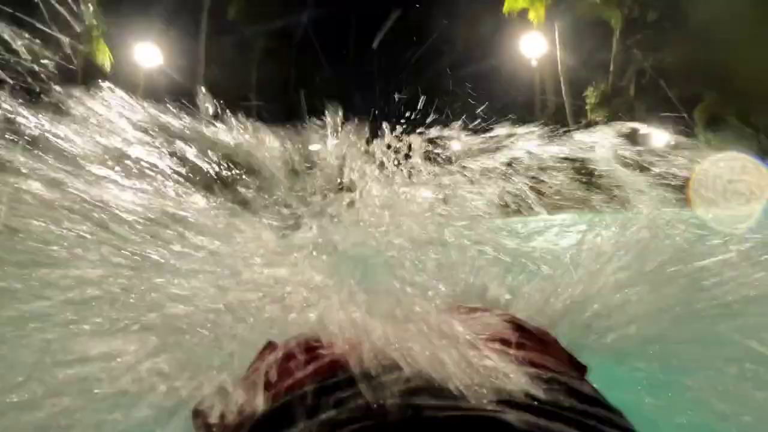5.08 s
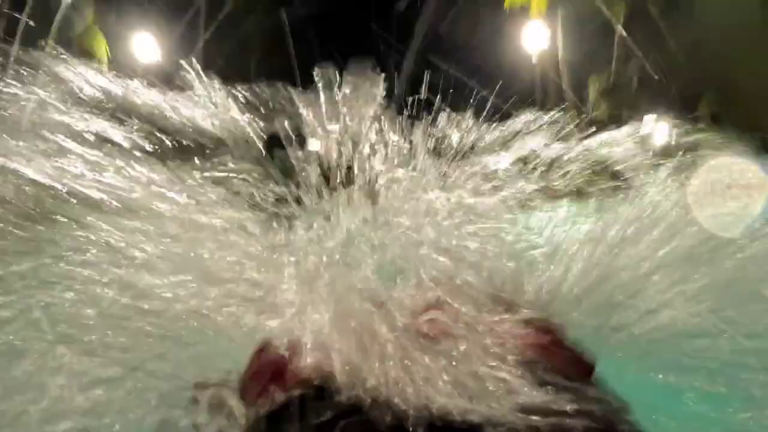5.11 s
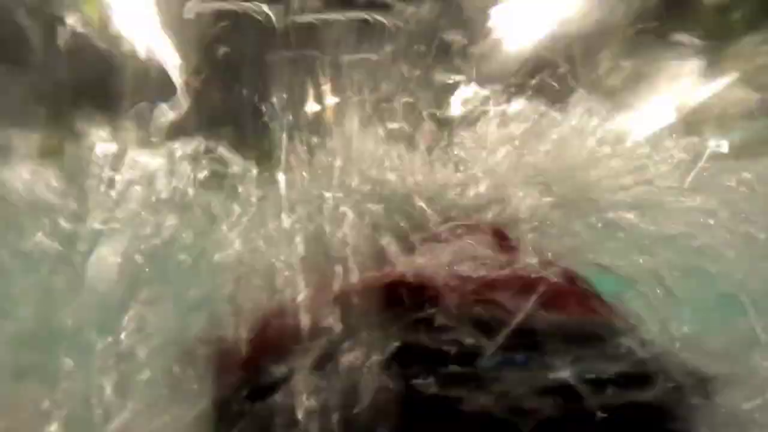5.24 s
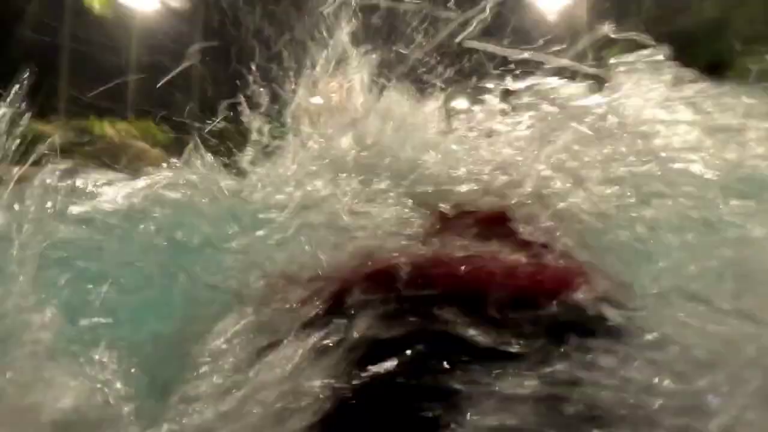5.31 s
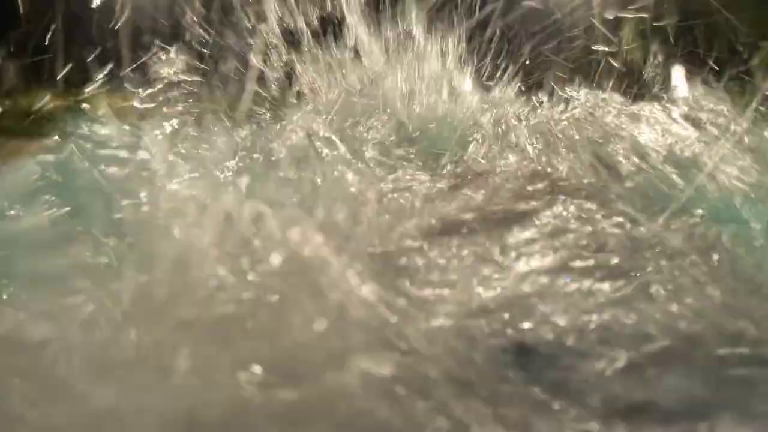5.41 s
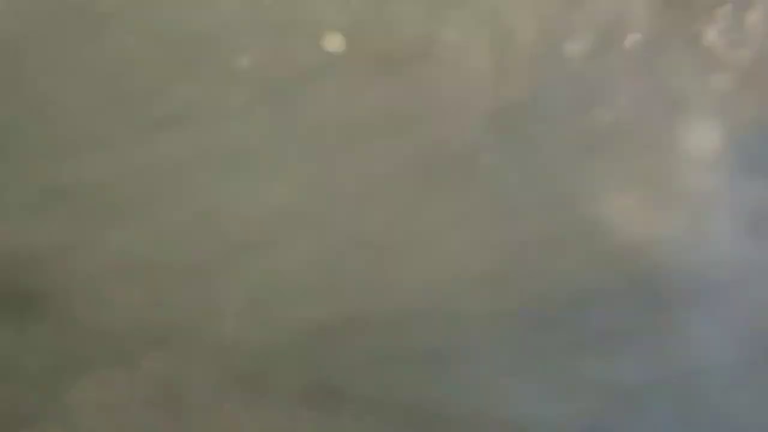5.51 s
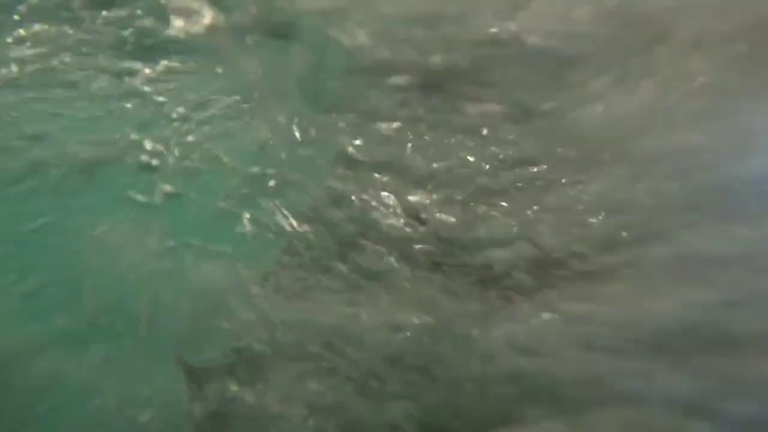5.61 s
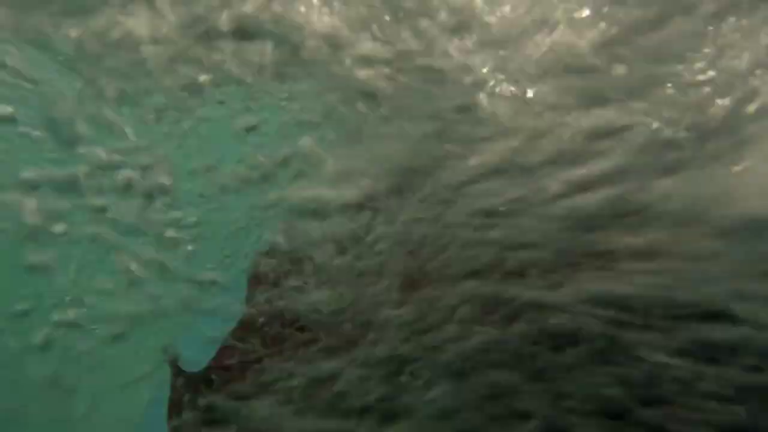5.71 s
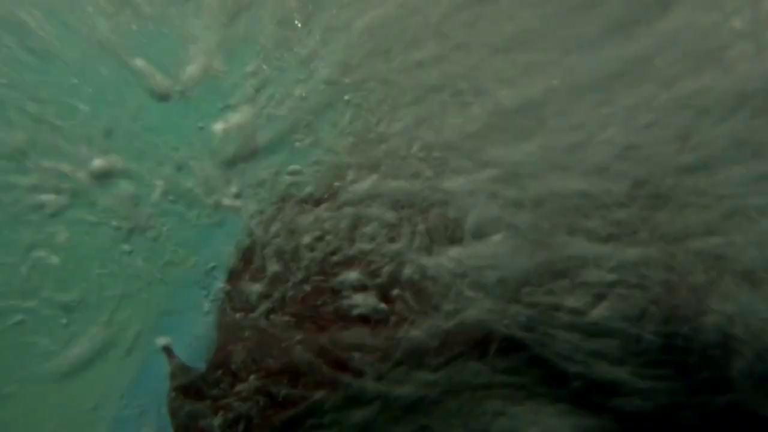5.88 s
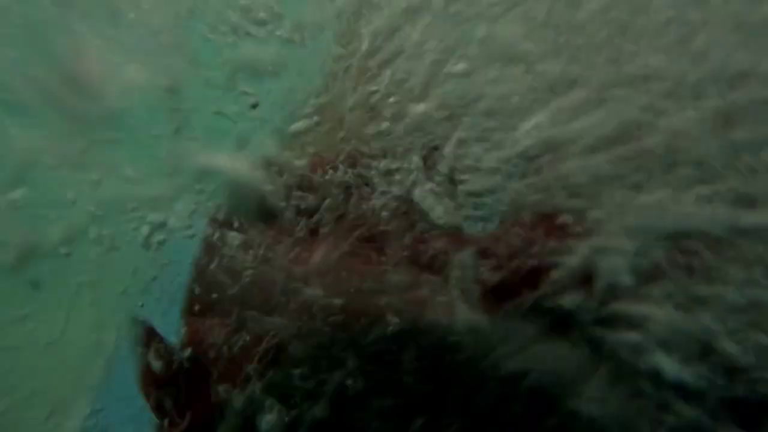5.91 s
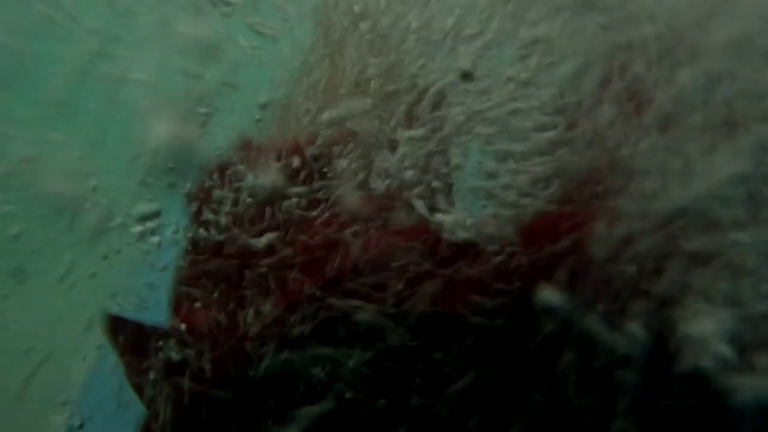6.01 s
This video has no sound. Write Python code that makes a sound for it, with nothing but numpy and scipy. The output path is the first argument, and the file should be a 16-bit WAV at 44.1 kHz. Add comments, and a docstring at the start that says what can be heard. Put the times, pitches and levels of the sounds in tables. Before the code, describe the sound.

Low wind buffeting and hollow water hiss with scattered drop knocks in a tube, then a hard slap, bright splash and churning underwater bubbles.

```python
"""A plunge into a pool ends a ride down a dark, enclosed water slide, heard by a camera the rider carries.
At the exit a wave slaps the case (noise bursts), spray bursts over it and the sound sinks into churning
bubbles (gliding, decaying sines). Before that, stray drops knock on the case (struck modes) and spatter
drums on it, the sheet of water hisses in the tube (filtered noise and clicks) and air buffets the
microphone (very low noise)."""
import sys
import numpy as np
from scipy import signal
from scipy.fft import rfft, irfft, next_fast_len
from scipy.io import wavfile
from scipy.ndimage import uniform_filter1d, map_coordinates

SR = 44100
rng = np.random.default_rng(int(sys.argv[2]) if len(sys.argv) > 2 else 0)


def output_pcm(signal):
    """Save a mono or channel-first signal as 16-bit PCM at the path in sys.argv[1].

    Samples are clipped to [-1, 1] before scaling.
    """
    pcm = np.clip(np.atleast_2d(signal).T, -1, 1) * 32767
    wavfile.write(sys.argv[1], SR, np.round(pcm).astype(np.int16))


N = 276507
TIME, FREQ = np.arange(N) / SR, np.fft.rfftfreq(N, 1 / SR)


def gain_of(db):
    """Decibels to amplitude."""
    return 10 ** (np.asarray(db) / 20)


def evened(x):
    """Scales to an rms of one."""
    return x / np.sqrt(np.mean(x ** 2) + 1e-20)


def read(points, hz=FREQ):
    """Reads a spectrum along a log-frequency axis."""
    point_hz, value = np.transpose(points)
    return np.interp(np.log(hz + 1), np.log(point_hz + 1), value)


def curves(rows):
    """Each column of a curve table at every sample."""
    s, *columns = np.transpose(rows)
    return [np.interp(TIME, s, column) for column in columns]


def coloured(x, db):
    """Filters by a gain in dB for each frequency."""
    size = next_fast_len(N + 4096)
    gain = gain_of(np.interp(np.fft.rfftfreq(size, 1 / SR), FREQ, db))
    return irfft(rfft(x, size) * gain, size)[..., :N]


def spread(pair, side):
    """Two signals become the middle and the coloured side of the microphone pair."""
    wide = coloured(pair[1], read(side))
    return np.array([pair[0] + wide, pair[0] - wide])


def add(mix, s, sound):
    """Mixes a sound in at a time."""
    part = mix[..., round(s * SR):][..., :sound.shape[-1]]
    part += sound[..., :part.shape[-1]]


def drift(per_s):
    """Smooth chance of rms one, with per_s new values a second."""
    knots = rng.standard_normal(4096)
    return evened(map_coordinates(knots, [TIME * per_s], order=2, mode="wrap"))


def impacts(per_s, range_db, count=N):
    """Two trains of random clicks, most small and a few large."""
    chance = rng.random((2, count))
    size = np.minimum(rng.exponential(1, (2, count)), 4)
    return (chance < per_s / SR) * gain_of(range_db * size) * rng.choice([-1., 1.], (2, count))


def surge(s, db, width_s):
    """The power of a bell-shaped surge around a moment."""
    return gain_of(db) ** 2 * np.exp(-.5 * ((TIME - s) / width_s) ** 2)


def swell(crest_s, crest_db, rise_db_per_s, fall_db_per_s):
    """A level in dB that climbs steadily to a crest and sinks again."""
    before_s, after_s = np.maximum(crest_s - TIME, 0), np.maximum(TIME - crest_s, 0)
    return crest_db - rise_db_per_s * before_s - fall_db_per_s * after_s


def bubble(hz, t60_s, rise):
    """A pocket of air rings and climbs in pitch as it nears the surface."""
    t = np.arange(int(max(t60_s, .001) * SR)) / SR
    ring = np.sin(2 * np.pi * hz * t * (1 + rise * t / t60_s))
    return ring * np.exp(-np.log(1000) * t / t60_s) * (1 - np.exp(-2 * hz * t))


CLUMPS_PER_S = 90
BUBBLE_DETUNE, RING_SPREAD, GLIDE_SPREAD = .03, 1.5, .3  # +- share of pitch, factor up or down, +- rise


def fizz(lo_hz, hi_hz, per_s, cycles, range_db, wash_db, rise, clump_db, count=40):
    """Bubble cloud: each size has its own clumps, ring and glide, over a fine crackle of droplets."""
    out, start = np.zeros((2, N)), int(5.3 * SR)
    beat = (TIME[start:] - TIME[start]) * CLUMPS_PER_S
    for hz in np.geomspace(lo_hz, hi_hz, count):
        detune, ring, glide = rng.uniform(-1, 1, 3)
        t60_s = cycles / hz * RING_SPREAD ** ring
        grain = bubble(hz * (1 + BUBBLE_DETUNE * detune), t60_s, rise + GLIDE_SPREAD * glide)
        clumps = gain_of(clump_db * np.interp(beat, np.arange(256), rng.uniform(-1, 1, 256)))
        births = clumps * impacts(per_s / count, range_db, N - start)
        out[:, start:] += hz * signal.oaconvolve(births, grain[None], axes=1)[:, :N - start]
    wash = evened(impacts(per_s=5000, range_db=3, count=N - start))
    out[:, start:] = evened(out[:, start:]) + gain_of(wash_db) * wash
    return out


# cloud spectra, large bubbles to fine spray: (frequency [Hz], level [dB])
CHURN_COLOUR = [(45, -7), (90, -8), (150, -13), (200, -5), (250, -2.5), (350, -7.5), (500, -6.5),
                (700, -9.5), (900, -16), (1300, -12), (2000, -68)]
SPLASH_COLOUR = [(400, -23), (750, 0), (1100, 3), (1600, 6), (2150, -.5), (2800, -2.5), (4100, -16),
                 (4900, -30), (8000, -82)]
SPRAY_COLOUR = [(1900, -6), (3300, -0.5), (4100, -1.5), (5000, -4.5), (6400, -7), (7900, -15.5),
                (9300, -21), (10200, -27), (12000, -32), (13500, -43), (16000, -68)]
# stereo width of water on the case: (frequency [Hz], side against mid [dB])
POOL_SIDE = [(100, -17.5), (250, -24), (400, -13), (600, -7), (1060, -10.5), (1600, -12), (2300, -7.5),
             (3600, -3.5), (4600, -10.5), (6300, -11.5), (10600, -6)]
# displaced water sloshes back over the camera and lifts all the clouds: (time [s], lift [dB])
SLOSHES = [(5.6, 3.5), (5.685, 4.5), (5.785, 4), (5.86, 3), (5.945, 2), (6.005, 3.5), (6.08, 1.5),
           (6.15, 3), (6.25, 1.5)]
SLOSH_WIDTH_S = .016
# the camera enters the pool, is deep enough for the large bubbles, then the water closes over it
ENTRY_S, CHURN_START_S, UNDER_S, CLOSING_S = 5.484, 5.567, 6.118, .035
SPRAY_MUFFLE_DB, SPLASH_MUFFLE_SHARE = -14, .26
NARROW_S, NARROWING_DB_PER_S = 5.83, 20  # bubbles draw to the middle as the camera sinks


def plunge():
    """Spray and splash burst over the case; as the camera sinks, larger bubbles take over."""
    muffle_db = SPRAY_MUFFLE_DB * np.clip((TIME - UNDER_S) / CLOSING_S, 0, 1)
    bursts = drift(80)
    slosh_db = sum(db * np.exp(-.5 * ((TIME - s) / SLOSH_WIDTH_S) ** 2) for s, db in SLOSHES)
    side_gain = gain_of(np.clip(NARROWING_DB_PER_S * (NARROW_S - TIME), -5, 5))
    width = np.array([np.ones(N), side_gain])

    churn = (TIME > CHURN_START_S) * width * fizz(
        110, 999, per_s=1100, cycles=19, range_db=1, wash_db=-16, rise=.25, clump_db=1.5)
    churn_db = swell(crest_s=6.0, crest_db=-22, rise_db_per_s=19, fall_db_per_s=8)

    splash = width * fizz(
        724, 4400, per_s=2600, cycles=19, range_db=2.0, wash_db=-10, rise=.18, clump_db=6)
    splash_db = swell(crest_s=5.62, crest_db=-23.3, rise_db_per_s=95, fall_db_per_s=19)
    splash_db = splash_db + SPLASH_MUFFLE_SHARE * muffle_db + 1.7 * bursts

    spray = fizz(2960, 11000, per_s=3200, cycles=28, range_db=2.5, wash_db=-8, rise=.1, clump_db=7)
    spray_db = swell(crest_s=5.62, crest_db=-27, rise_db_per_s=35, fall_db_per_s=53)
    spray_db = spray_db + muffle_db + 1.8 * bursts

    clouds = [(churn, CHURN_COLOUR, churn_db), (splash, SPLASH_COLOUR, splash_db),
              (spray, SPRAY_COLOUR, spray_db)]
    wet = TIME > ENTRY_S
    out = np.zeros((2, N))
    for cloud, colour, level_db in clouds:
        water = spread(coloured(cloud, read(colour)), POOL_SIDE)
        out += gain_of(level_db) * water / water.mean(0)[wet].std()
    return out * gain_of(slosh_db) * uniform_filter1d(wet * 1., size=700)


# water slapping the case: (time [s], relative level [dB], decay to 1/e [s])
SLAPS = [(0.1325, -29, 0.0036), (5.3901, -2.2, 0.0016), (5.4015, -29, .002), (5.427, -38, .002),
         (5.436, -35, .002), (5.474, -25, .006), (5.482, -23, .006), (5.4954, -14.5, .004),
         (5.508, -25, .0015), (5.5135, -19, .002), (5.5365, -23.5, .007), (5.595, -20, .002),
         (5.635, -23, .006), (5.694, -22, 0.0011), (5.762, -24, .003), (5.775, -21, .003),
         (5.853, -28, .004), (5.965, -32, .002), (6.011, -27, 0.002), (6.029, -25, .002),
         (6.044, -34, .0015), (6.078, -31, .002), (6.102, -31, .002), (6.122, -34, .003),
         (6.146, -36, .002), (6.174, -42, .0015), (6.208, -42, .002), (6.221, -42, .003)]
# slap spectrum: (frequency [Hz], level [dB])
SLAP_COLOUR = [(100, -8), (550, 10), (1000, 3), (2000, 2), (3500, -8), (4800, 1), (6500, 3.5), (10000, -7),
               (11800, -24), (16000, -42)]


def slaps():
    """Sheets of water smack the case in short noise bursts; the harder the slap, the brighter it is."""
    out, t = np.zeros((2, N)), np.arange(2048) / SR
    for s, db, decay_s in SLAPS:
        burst = gain_of(db + 2) * np.exp(-t / decay_s) * rng.standard_normal((2, len(t)))
        burst[1] *= gain_of(-8)  # weak side: both ports are hit almost alike
        soft = np.clip(-db / 42, 0, .9)
        add(out, s, signal.lfilter([1 - soft], [1, -soft], burst))
    return spread(coloured(out, read(SLAP_COLOUR)), POOL_SIDE)


# slugs of water that shove the case: (time [s], peak [dB], width [s])
THUDS = [(.591, -19, .0026), (.634, -23, .0023), (.695, -15, .0039), (.728, -19, .0037), (.769, -22, .0011),
         (1.104, -28, .0012), (1.4, -18.5, .0026), (1.456, -20, .0023), (2.451, -24, .0014),
         (2.513, -16, .003), (2.595, -15.5, .005), (2.692, -18.5, .003), (2.935, -15.5, .0039),
         (3.548, -23, .0026), (4.769, -23, .0026), (4.871, -20, .0014), (5.262, -16, .004),
         (5.339, -14.5, .00135), (5.368, -16, .003), (5.3915, -10, .002), (5.437, -10, .0021),
         (5.476, -11, .0025), (5.483, -16, .0016), (5.572, -9.5, .0022), (5.611, -11, .0016),
         (5.64, -9, .0034), (5.654, -6.5, .0038), (5.694, -8.5, .0028), (5.742, -5, .004),
         (5.841, -8.5, .0038), (5.863, -7, .0014), (6.253, -11, .003)]


def thuds():
    """Each slug of water is one push of pressure with a shallow rebound on either side."""
    out, t = np.zeros(N), np.arange(-1024, 1024) / SR
    for s, db, width_s in THUDS:
        u = t / width_s
        add(out, s + t[0], gain_of(db) * (1 - u ** 2) / (1 + u ** 2 / 2) ** 3)
    return out


# single bubbles: (time [s], level [dB], starting pitch [Hz], t60 [s])
POCKETS = [(.132, -26, 3300, .02), (.1316, -23, 2000, .009), (.543, -33, 3000, .03), (5.39, -9, 560, .022),
           (5.4, -22, 1400, .014), (5.411, -28, 800, .02), (5.493, -14.5, 2850, .03),
           (5.4975, -18, 700, .026), (5.4985, -18, 4800, .012), (5.507, -22, 1650, .014),
           (5.5125, -7.5, 2660, .012), (5.5155, -19, 6100, .01), (5.5233, -4, 1380, .013),
           (5.5238, -14, 850, .014), (5.558, -17, 2830, .024), (5.567, -19, 1200, .018),
           (5.572, -12, 603, .024), (5.594, -12, 1550, .039), (5.601, -13, 1330, .025),
           (5.605, -14, 2900, .016), (5.621, -16, 6300, .01), (5.634, -14, 4000, .016),
           (5.644, -16, 6100, .01), (5.669, -11, 1060, .016), (5.671, -12, 3400, .014),
           (5.681, -13, 1400, .025), (5.689, -15, 700, .028), (5.692, -10, 1550, .012),
           (5.717, -19, 5500, .012), (5.724, -15, 2200, .02), (5.739, -11, 1830, .024),
           (5.742, -10, 542, .036), (5.754, -15, 1300, .025), (5.762, -17, 4700, .012),
           (5.783, -14, 760, .02), (5.79, -5.5, 510, .023), (5.7977, -10, 1110, .018),
           (5.798, -10, 1550, .022), (5.837, -16, 1530, .02), (5.843, -16, 450, .06),
           (5.862, -16, 570, .045), (5.882, -18, 680, .045), (5.891, -23, 4900, .012),
           (5.932, -17, 2050, .025), (5.939, -25, 3450, .028), (5.951, -17, 1050, .022),
           (5.9753, -14, 945, .025), (5.992, -17, 760, .035), (5.999, -21, 2400, .025),
           (6.0165, -9, 1760, .011), (6.017, -17, 2850, .009), (6.027, -18, 3800, .014),
           (6.029, -14.5, 3080, .022), (6.052, -21, 1330, .02), (6.081, -19, 1804, .03),
           (6.085, -19, 1000, .035), (6.087, -18, 580, .05), (6.102, -21, 1720, .024),
           (6.119, -28, 3000, .016), (6.141, -19, 1670, .018), (6.142, -18, 2790, .018),
           (6.146, -23, 3400, .012), (6.1713, -19, 966, .04), (6.204, -20.5, 1980, .02),
           (6.24, -34, 3400, .012), (6.242, -21, 1240, .025), (6.256, -22, 1600, .014)]


def pockets():
    """Single bubbles pop and plop right beside the microphone, each a decaying, rising sine."""
    out = np.zeros(N)
    for s, db, hz, t60_s in POCKETS:
        add(out, s, gain_of(db) * bubble(hz, t60_s, rise=0.083))
    return out


# big pockets of air dragged under water: (time [s], level [dB], starting pitch [Hz], length [s])
GULPS = [(5.895, -25, 265, .07), (5.905, -24, 380, .06), (5.975, -14.5, 240, .095), (5.985, -22, 485, .045),
         (6.06, -22, 270, .045), (6.118, -22, 585, .035), (6.128, -14.5, 252, .085), (6.135, -17, 50, .12),
         (6.14, -19, 312, .045), (6.175, -19, 290, .04), (6.203, -21, 318, .05), (6.228, -22, 685, .05),
         (6.238, -20, 430, .035)]
GULP_CLIMB, GULP_CREST = .06, .55  # share of pitch gained; exponent, under 1 = early crest
GULP_WOBBLE, GULP_ROUGH = .05, .35  # rms share of pitch, of amplitude


def gulps():
    """A big air pocket swells into a round note that wobbles, sputters and climbs as it shrinks."""
    out, wobble, sputter = np.zeros(N), GULP_WOBBLE * drift(90), 1 + GULP_ROUGH * drift(130)
    for s, db, hz, length_s in GULPS:
        u = np.clip((TIME - s) / length_s, 0, 1)
        pitch_hz = hz * (1 + GULP_CLIMB * u + wobble)
        phase = 2 * np.pi * np.cumsum(pitch_hz * (u > 0)) / SR
        out += gain_of(db) * np.sin(np.pi * u ** GULP_CREST) * np.sin(phase)
    return out * sputter


# drops that knock on the case:
# (time [s], level [dB], thud trim against it [dB], ring trim against it [dB])
KNOCKS = [(.1284, -22, -4, -20), (.1316, -12, .5, .5), (.5052, -9.5, -2.5, -5), (.5265, -23.5, 10, 13),
          (.629, -22.5, -2, 0), (.691, -21, 1, -15), (.724, -22, -1, -19), (.8103, -22.5, -3, 7.5),
          (1.444, -22.5, 1, -4), (1.5693, -14.5, 2, -25), (1.904, -31, 7, 1), (1.957, -29, 0, -15),
          (2.0156, -19.5, 1.5, 4.5), (2.029, -25, -3, -15), (2.1095, -21.5, 6, -25), (2.451, -29, 2, -15),
          (2.4895, -25.5, 3, -22), (2.514, -28, 0, -15), (2.592, -32, 16, -11), (2.6424, -18, 3.5, -20),
          (2.663, -28, 2, -15), (2.686, -28, 4, -15), (3.283, -15, 1.5, -17), (4.378, -37, 8, 7),
          (4.6299, -10.5, 1.5, -19), (4.674, -32, 12, -14), (5.0454, -17, -.5, -25), (5.205, -28, 8, -15),
          (5.258, -25, 9, -10), (5.322, -22, 2, 0), (5.367, -22, 9, -15), (5.4312, -7, -12, -25),
          (5.478, -19, 1, -10)]
# modes of the struck case:
# (nominal frequency [Hz], level [dB], t60 [s], rise [s], direction of first swing [+-1])
CASE_MODES = [(1510, 0.5, .0066, .0004, -1), (940, 5, 0.0047, 0.00069, 1), (383, -1, 0.013, 0.00094, -1),
              (268, -4.5, .024, 0.00091, 1), (138.5, 3.5, 0.036, 0.0048, -1)]
CASE_DETUNE = .1  # +- share of mode frequency
RING_NOMINAL_HZ = 634  # also parts click modes from thud modes
RATTLE_DB, RATTLE_DECAY_S = -17, .011  # droplets that a burst drop scatters over the case


def knocks():
    """A drop clicks, thuds by where it lands and scatters droplets; some drops trap air that rings."""
    out, t = np.zeros((2, N)), np.arange(4096) / SR
    for s, db, thud_db, ring_db in KNOCKS:
        place = 1 + CASE_DETUNE * rng.uniform(-1, 1, len(CASE_MODES))
        click, thud = np.zeros(len(t)), np.zeros(len(t))
        for k, (hz, mode_db, t60_s, rise_s, way) in zip(place, CASE_MODES):
            envelope = gain_of(mode_db - 60 * t / t60_s) * (1 - np.exp(-t / rise_s))
            mode = np.sign(way) * envelope * np.sin(2 * np.pi * hz * k * t)
            if hz > RING_NOMINAL_HZ:
                click += mode
            else:
                thud += mode
        ring = np.sin(2 * np.pi * RING_NOMINAL_HZ * rng.uniform(0.88, 1.05) * t)
        ring *= (1 - np.exp(-t / 0.0014)) * np.exp(-t / 0.0022)
        droplets = impacts(per_s=450, range_db=2, count=len(t))[0] * np.exp(-t / RATTLE_DECAY_S)
        rattle = gain_of(RATTLE_DB) * signal.fftconvolve(droplets, click + thud)[:len(t)]
        knock = click + rattle + gain_of(thud_db) * thud + gain_of(ring_db + 3.5) * ring
        add(out[0], s + .00012, gain_of(db) * knock)  # the left port lies a little farther away
        add(out[1], s, gain_of(db) * knock)
    return coloured(out, -10 * np.log10(1 + (FREQ / 1850) ** 24))


# flurries of fine spatter on the case: (time [s], level [dB], width [s])
SPATTER = [(.05, -43, .012), (.634, -36, .006), (.662, -33, .011), (.712, -29, .015), (.765, -31, .018),
           (.805, -38, .012), (.985, -42, .015), (1.45, -41, .05), (1.64, -41, .012), (1.958, -35, .014),
           (1.99, -37, .018), (2.59, -39, .012), (2.68, -39, .025), (2.91, -42, .03), (3.17, -42, .06),
           (4.67, -38.5, .035), (4.88, -43, .02), (5.24, -37, .025), (5.36, -31.5, .045), (5.485, -30, .02),
           (5.55, -35, .018), (5.69, -32, .06), (5.85, -30, .03)]
# spatter spectrum: (frequency [Hz], density [dB per Hz])
SPATTER_COLOUR = [(50, -0.5), (110, 0), (250, -2.5), (380, -7), (700, -14.5), (1750, -15.5), (2150, -29),
                  (2900, -17), (3700, -31.5), (9000, -79)]
SPATTER_FLOOR_DB = -52  # between the flurries


def spatter():
    """Flurries of small drops drum dully on the case: clumped random clicks, filtered."""
    drops = spread(coloured(impacts(per_s=2600, range_db=3), read(SPATTER_COLOUR)), POOL_SIDE)
    clumps = gain_of(3.2 * drift(110))
    power = gain_of(SPATTER_FLOOR_DB) ** 2 + sum(surge(*row) for row in SPATTER)
    return evened(drops * clumps) * np.sqrt(power)


# hiss of water running in the tube: (time [s], relative level [dB])
FLOW = [(0.0, -48.0), (0.5, -52.5), (0.72, -48.5), (0.95, -52.0), (1.2, -48.5), (1.45, -52.5),
        (1.65, -51.0), (2.05, -52.0), (2.25, -55.5), (2.6, -53.0), (2.85, -52.0), (3.15, -52.0),
        (3.4, -55.0), (3.72, -55.5), (4.0, -54.0), (4.7, -53.0)]
# water spectrum: (frequency [Hz], density [dB per Hz])
FLOW_COLOUR = [(80, 11), (200, -3), (400, -4.5), (700, -1.5), (1300, -5), (1850, -0.5), (2050, -7.5),
               (3700, -13.5), (6800, -21), (7800, -27), (10000, -39), (11300, -50), (15000, -63)]
# resonances of the case around the microphone: (frequency [Hz], width [Hz], boost [dB])
CASE_RESONANCES = [(920, 185, 4), (1563, 570, 4), (2910, 520, 9.5), (4840, 1260, 6), (6550, 700, 6)]
# short echoes off the tube wall: (delay [s], level [dB])
WALL_ECHOES = [(.0037, -26), (.0074, -17.5), (0.0131, -23.5), (0.022, -22.5)]
# stereo width of the flow: (frequency [Hz], side against mid [dB])
FLOW_SIDE = [(250, -11), (420, -6.5), (630, -4), (850, -5), (1100, 3.5), (1400, -13), (1800, -8), (2100, 0),
             (3000, -4), (3600, 0), (4500, -13), (6600, -21), (9000, -12), (11500, -3)]
# gain on the whole flow; the slap leaves the ports wet and shuts the hiss out: (time [s], gain [dB])
DRENCHED = [(5.385, 2), (5.41, -11.5), (5.47, -7), (5.65, -42)]
# levels before the DRENCHED gain; BODY_FOLLOWS = dB of body per dB of hiss
FLOW_USUAL_DB, BODY_DB, BODY_FOLLOWS = -52.5, -45.6, .7
# the rush at the outlet grows as the rider nears it
OUTLET_S, OUTLET_BODY_DB, OUTLET_TREBLE_DB, APPROACH_DB_PER_S = 5.38, -29.5, -35.3, 35


def flow():
    """The sheet of water hisses and crackles in the tube, through the resonant case; the outlet nears."""
    hiss_db = curves(FLOW)[0]
    near_db = APPROACH_DB_PER_S * np.minimum(TIME - OUTLET_S, 0)
    colour_db = read(FLOW_COLOUR)
    for hz, width_hz, db in CASE_RESONANCES:
        colour_db += db * np.exp(-2 * ((FREQ - hz) / width_hz) ** 2)
    # echoes comb the hiss and make it hollow
    echoes = sum(gain_of(db) * np.exp(-2j * np.pi * FREQ * delay_s) for delay_s, db in WALL_ECHOES)
    colour_db += 20 * np.log10(abs(1 + echoes) + 1e-3)
    crackle = evened(impacts(per_s=1200, range_db=1))
    water = rng.standard_normal((2, N)) + gain_of(-2) * crackle
    water = spread(coloured(water, colour_db), FLOW_SIDE)
    body = coloured(water, -10 * np.log10(1 + (FREQ / 3700) ** 12))
    treble = water - body
    # both bands flicker, each on its own
    body_db = BODY_DB + BODY_FOLLOWS * (hiss_db - FLOW_USUAL_DB)
    body_gain = np.hypot(gain_of(body_db), gain_of(OUTLET_BODY_DB + near_db))
    body_gain = body_gain * gain_of(.84 * drift(24.8))
    treble_gain = np.hypot(gain_of(hiss_db - 2.9), gain_of(OUTLET_TREBLE_DB + near_db))
    treble_gain = treble_gain * gain_of(.7 * drift(35))
    return gain_of(curves(DRENCHED)[0]) * (body_gain * evened(body) + treble_gain * evened(treble))


def eddies(colour):
    """Slow swirls of pressure of even strength: low noise divided by its own envelope."""
    swirl = signal.hilbert(coloured(rng.standard_normal(N), read(colour)), next_fast_len(N))[:N]
    return evened(swirl.real / np.sqrt(uniform_filter1d(abs(swirl) ** 2, size=4000)))


# steady push of air on the microphone, following the rider's speed: (time [s], level [dB])
BUFFET = [(0, -26), (1.3, -23.8), (1.85, -28), (2.25, -27.5), (2.95, -26), (3.45, -30), (3.75, -28),
          (4.1, -24), (5.0, -24), (5.15, -26), (5.82, -26), (6.02, -37), (6.27, -28)]
# gusts on top of it: (time [s], level [dB])
GUSTS = [(.12, -17), (.25, -17), (.38, -19), (.72, -21), (.92, -20), (1.22, -21), (1.42, -20), (1.54, -14),
         (2.1, -16.5), (2.63, -20), (2.95, -21), (3.25, -12), (3.52, -24), (3.93, -21), (4.48, -20),
         (4.63, -16), (4.92, -20), (5.35, -21)]
GUST_WIDTH_S = .04
# spectra of draught, gusts and pool wallow: (frequency [Hz], density [dB per Hz])
BUFFET_COLOUR = [(8, -3), (15, 6.5), (24, 3), (36, 1.5), (65, -12), (95, -19.3), (130, -29), (220, -47),
                 (480, -100)]
GUST_COLOUR = [(8, -3), (15, 5), (26, 5), (36, 0), (65, -12), (95, -21), (130, -33), (400, -100)]
WALLOW_COLOUR = [(15, -14), (40, -3), (65, 0), (95, -5), (140, -16), (220, -31), (480, -80)]


def buffet():
    """Eddies press on both ports alike: steady draught, deeper gusts, then the heave of the pool water."""
    draught = gain_of(curves(BUFFET)[0]) * eddies(BUFFET_COLOUR)
    gust_gain = np.sqrt(sum(surge(s, db, GUST_WIDTH_S) for s, db in GUSTS))
    gusts = gust_gain * eddies(GUST_COLOUR)
    wallow_db = swell(crest_s=5.67, crest_db=-21, rise_db_per_s=30, fall_db_per_s=40)
    return draught + gusts + gain_of(wallow_db) * eddies(WALLOW_COLOUR)


def scene():
    """The ride down the tube, then the pool."""
    pool = plunge() + slaps() + thuds() + pockets() + gulps()
    return pool + knocks() + spatter() + flow() + buffet()


# the two microphone ports differ in colour: (frequency [Hz], left against right [dB])
PORT_BALANCE = [(200, 0), (340, .5), (600, -.5), (1060, 1), (1900, 3.5), (2700, 4), (3600, 1), (4800, -2.5),
                (6500, -1), (8000, 0), (10000, .5)]
EDGE_HZ = 15400


def record(dry):
    """Each port adds its colour, high peaks overload softly; then the band limit."""
    ports = np.array([coloured(x, sign * read(PORT_BALANCE) / 2) for x, sign in zip(dry, (1, -1))])
    held = ports / (1 + ports ** 6) ** (1 / 6)
    lowpass = signal.firwin(511, EDGE_HZ, window=("kaiser", 9), fs=SR)
    return signal.oaconvolve(held, lowpass[None], "same")


dry = scene()
out = record(dry)
output_pcm(out)
```